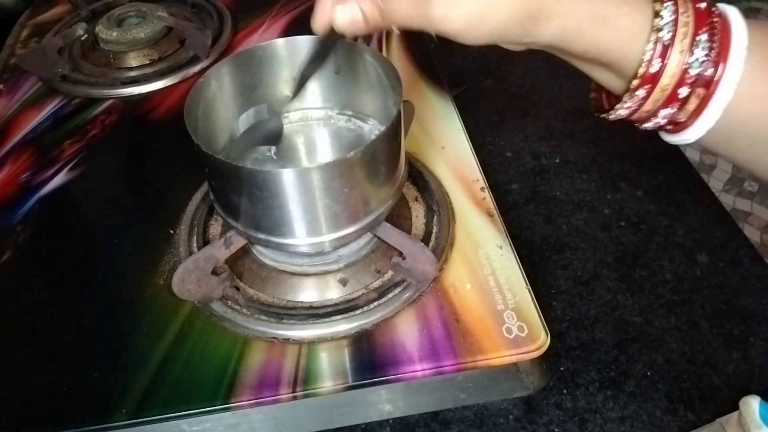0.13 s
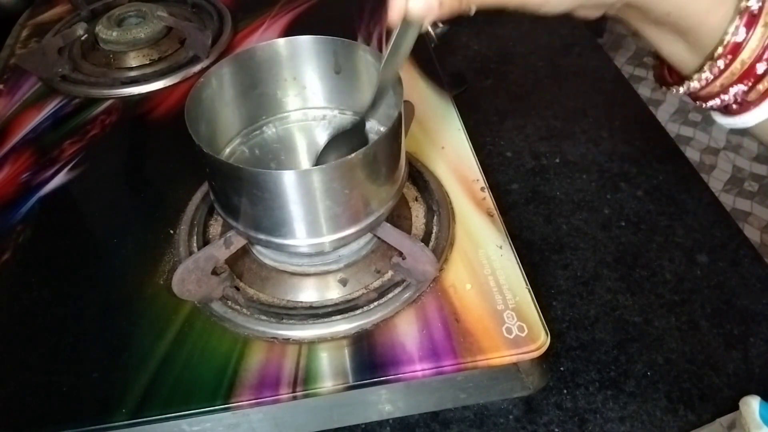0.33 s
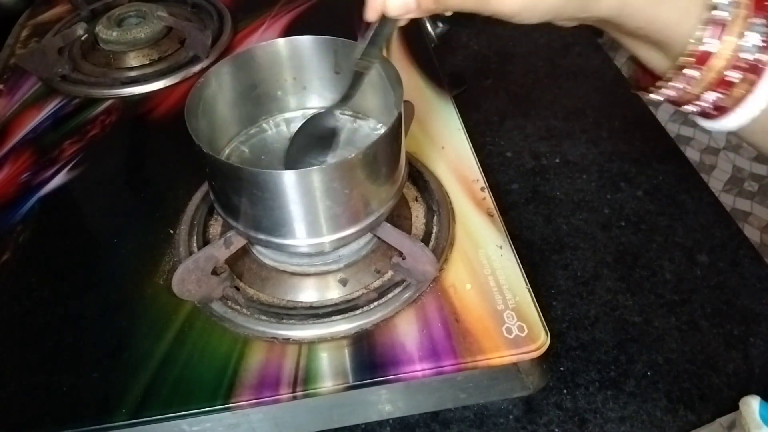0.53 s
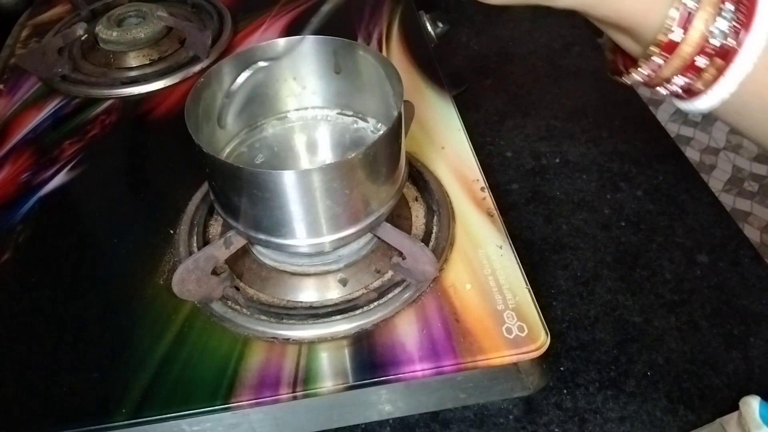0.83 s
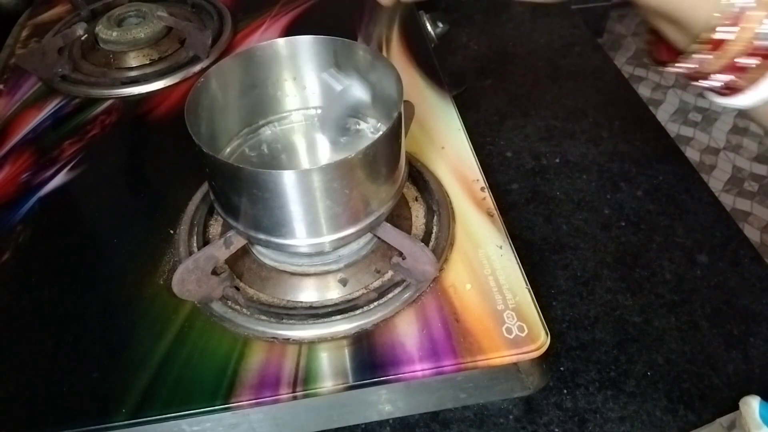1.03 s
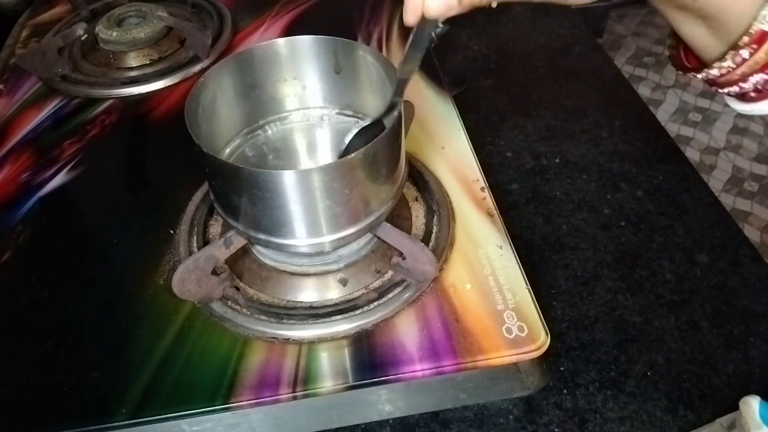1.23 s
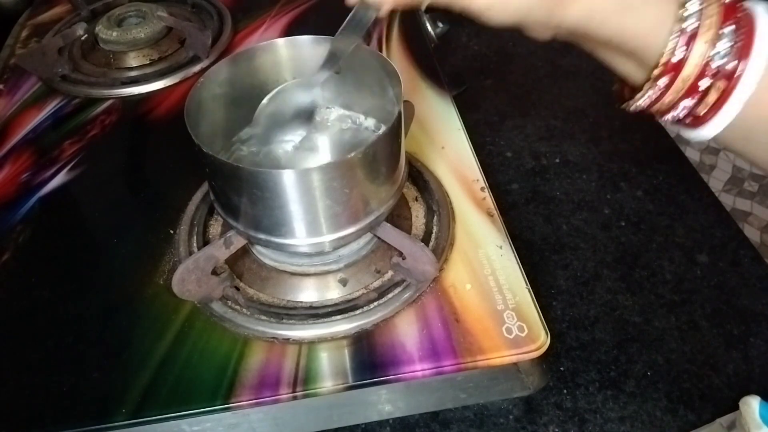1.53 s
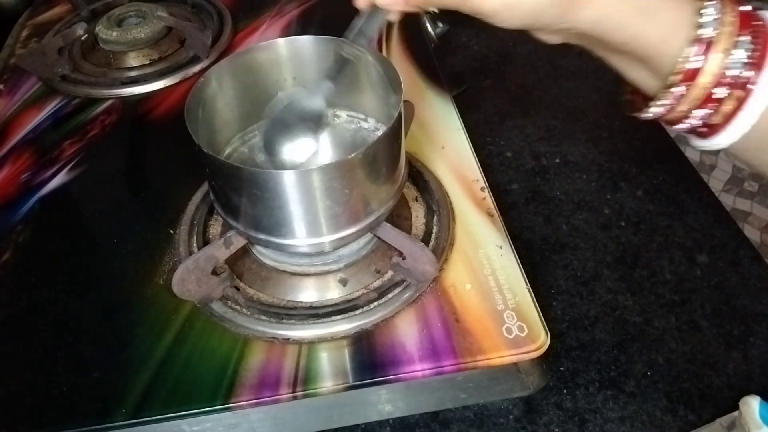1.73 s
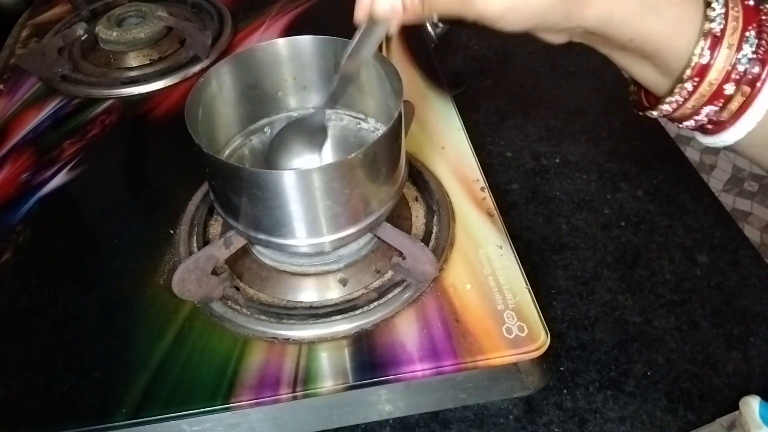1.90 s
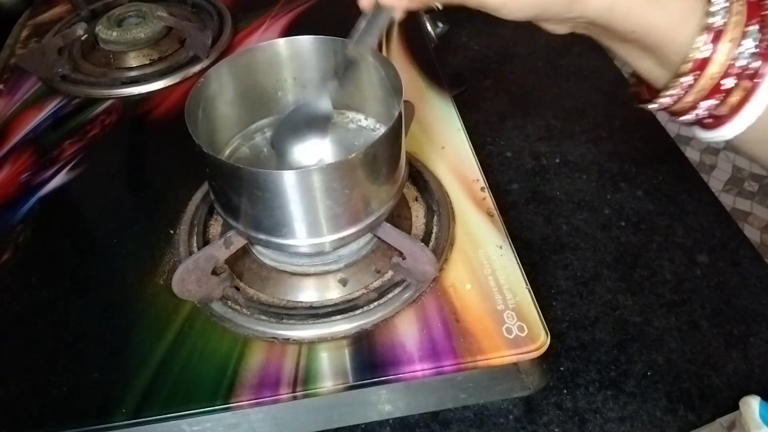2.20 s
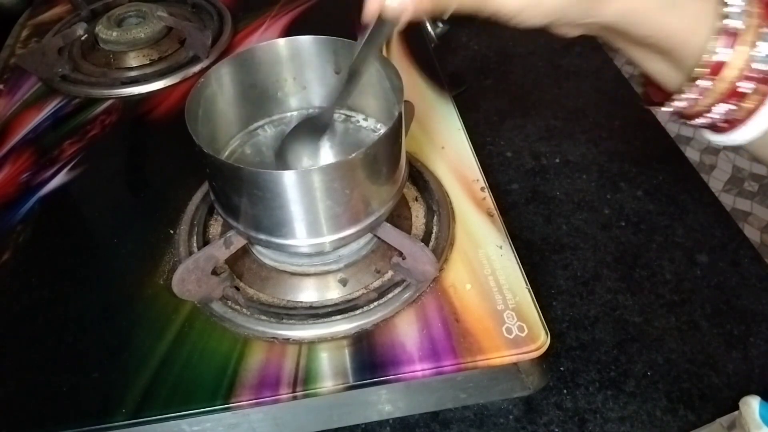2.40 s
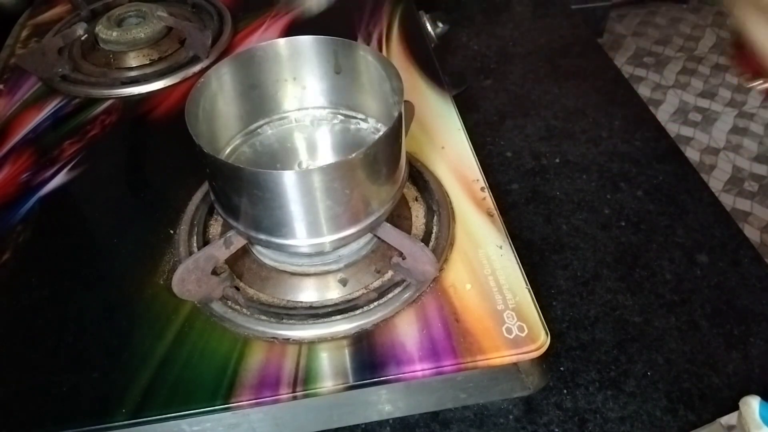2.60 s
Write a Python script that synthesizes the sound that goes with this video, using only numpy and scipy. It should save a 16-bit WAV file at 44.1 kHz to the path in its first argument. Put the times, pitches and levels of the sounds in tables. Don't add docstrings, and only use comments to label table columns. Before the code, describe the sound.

Spoon stirring in a small metal pot: gritty scrapes, dull knocks and bright ringing clinks

```python
import sys
import numpy as np
from scipy import signal
from scipy.fft import rfft, irfft, next_fast_len
from scipy.io import wavfile
from scipy.ndimage import uniform_filter1d, map_coordinates

SR = 44100
rng = np.random.default_rng(int(sys.argv[2]) if len(sys.argv) > 2 else 0)


def to_linear_factor(level_db):
    exponent = np.asarray(level_db, float) / 20
    return 10 ** exponent


def wav_record(signal):
    frames = np.transpose(np.atleast_2d(signal))
    bounded = np.clip(frames, -1, 1)
    quanta = np.round(bounded * 32767).astype(np.int16)
    wavfile.write(sys.argv[1], SR, quanta)


N = 121275

# [start t/s, hardest t/s, end t/s, hardest level/dB, end level/dB]
STROKES = [(0.001, 0.0025, 0.033, -78.5, -102), (0.205, 0.19, 0.23, -70, -72),
           (0.984, 0.99, 0.98, -63, -82), (0.2155, 0.15, 0.37, -47, -56.5), (0.406, 0.45, 0.58, -50, -55),
           (0.58, 0.62, 0.64, -51.5, -62), (0.653, 0.698, 0.7194, -55.5, -61),
           (0.999, 0.9, 1.14, -54.5, -56), (1.027, 1.032, 1.21, -45.5, -78.5),
           (1.335, 1.34, 1.355, -55.5, -57), (1.391, 1.482, 1.59, -49, -66),
           (1.624, 1.64, 1.66, -52, -59.5), (1.677, 1.694, 1.698, -50, -62),
           (1.74, 1.763, 1.844, -52.5, -61), (1.877, 1.902, 2.05, -51.5, -65.5),
           (1.962, 2.05, 2.07, -51, -53.5), (2.126, 2.166, 2.28, -50, -73),
           (2.234, 2.32, 2.294, -51, -49.5), (2.365, 2.23, 2.462, -47, -58.5)]
# [t/s, peak level/dB]
CATCHES = [
    (0.185, -77),
    (0.4691, -34.5),
    (0.673, -47),
    (0.8834, -82),
    (1.4593, -32),
    (1.6829, -31),
    (1.7605, -34),
    (1.8002, -32.5),
    (1.9047, -40),
    (2.145, -45.5),
]
# [f/Hz, width/Hz, level/dB]
SCRAPED_BASE = [(1130, 196, -4.5), (2186, 140, -2.5), (2760, 37, -11), (3065, 140, -4), (3747, 305, -10.5),
                (4730, 100, -6), (5400, 158, -8), (7125, 152, 5), (8560, 210, -3), (9800, 140, -2),
                (11120, 96, -4), (11850, 150, -13.5), (13650, 190, 0.5), (14940, 800, -7.5)]
# [f/Hz, level/dB]
FIZZ = [(410, -62), (700, -61), (1120, -7), (1850, -5), (2250, 6), (4130, 2), (7030, 4), (15500, -4.5)]
DEAD_HZ = [800, 1880, 4170, 4190, 6000]
# [t/s, f/Hz, level/dB]
GLIDES = [
    [(0.5, 1060, -78), (0.566, 1089, -52.5), (0.7, 1223, -92)],
    [(1.37, 983, -65), (1.412, 1180, -66.5), (1.64, 1046, -59.5)],
    [(0.33, 1058, -58), (0.42, 1107, -59.5), (0.5, 1088, -67)],
    [(1.72, 1010, -62), (1.8, 968, -61), (1.94, 999, -85.5)],
    [(1.88, 2084, -74), (1.91, 2224, -62), (1.95, 2390, -61)],
    [(1.99, 994, -76), (2.09, 1012, -60), (2.12, 1010, -80)],
    [(1.5, 1514, -84), (1.58, 1685, -70), (1.63, 1700, -83)],
    [(2.13, 1632, -75), (2.19, 1703, -67), (2.2, 1770, -62)],
    [(1.4, 600, -68), (1.61, 643, -82), (1.67, 680, -45)],
    [(0.95, 4100, -85), (0.988, 4110, -71), (0.996, 4200, -74)],
    [(2.13, 1057, -92), (2.174, 982, -46.5), (2.2, 1040, -57.5)],
    [(2.27, 1056, -70), (2.308, 1058, -48.5), (2.36, 1042, -67)],
]
# [t/s, f/Hz, peak level/dB, t60/s]
PINGS = [(.004, 6370, -70, .067), (.02, 1050, -76, .2), (.219, 1051, -38, .3), (.42, 4950, -58, .06),
         (.466, 3106, -60, .1), (.521, 1770, -64, .15), (.595, 3170, -51, .064), (.601, 2353, -57, .083),
         (.665, 2757, -50, .051), (.7, 2232, -58, .11), (.709, 660, -59, .15), (.719, 1050, -52, .22),
         (.721, 5488, -74, .5), (.965, 3480, -77, .06), (.968, 1020, -73, .05), (.989, 2480, -70, .04),
         (1.01, 7575, -55, .45), (1.02, 7790, -68, .9), (1.021, 6785, -60, .7), (1.022, 2332, -55, .4),
         (1.023, 8500, -53, .3), (1.03, 3185, -66, .6), (1.031, 603, -54, .4), (1.04, 5490, -45, .18),
         (1.06, 5487, -60, .6), (1.09, 3580, -58, .4), (1.1, 947, -58, .8), (1.341, 7570, -56, .2),
         (1.342, 575, -51, .13), (1.343, 3890, -59, .3), (1.46, 2230, -60, .077), (1.615, 2005, -62, .1),
         (2.02, 2167, -58, .15), (2.031, 1750, -60, .05), (2.13, 3338, -55, .11), (2.398, 2040, -41, .059),
         (2.444, 1072, -46.5, .16), (2.551, 630, -61, .2), (2.611, 1040, -61, .1), (2.649, 1050, -66, .14),
         (1.952, 395, -49, .18), (1.342, 1250, -48, .06), (.299, 1400, -46, .05)]
# [t/s, peak level/dB, hob thud level/dB, wall ring level/dB, snap level/dB]
KNOCKS = [(0.217, -22, -12, -15.5, 4), (0.298, -29, -8.5, -29, 8), (0.999, -34.5, -10.5, -4.5, 10.5),
          (1.017, -33.5, -7.5, -3.5, 13), (1.339, -29, -35, -37, -4.5), (1.64, -31.5, -28, -34, -20),
          (1.694, -31.5, -6.5, -51, 8.5), (1.949, -27.5, -13.5, -46, 2.5), (2.205, -25, -12, -42, 4.5),
          (2.4, -42, -7, -13.5, 16), (2.436, -27.5, -10, -51, 8)]
# [f/Hz, level/dB]
BASE = [(970, -2), (1052, 2.5), (1110, -6), (1220, -15.5), (1315, -1.5), (1470, -2.5), (1750, -23),
        (2055, -5), (2403, -7.5), (2750, -11.5), (3100, -19)]
# [f/Hz, level/dB]
HOB = [(345, -18.5), (395, 2), (490, 3), (608, 1.5), (650, -3.5), (760, -9)]
WALL_HZ = [950, 3578, 3770, 3882, 4893, 5412, 5488, 6145, 6641, 6939, 7570, 8400, 9857, 11210]
# [level/dB, t60/s]
WALL = [(-13.5, 0.86), (-21, 1), (-27, 1), (-7, 0.39), (-17, 0.83), (-15, 0.42), (3.5, 0.13), (-57, 0.19),
        (-7.5, 0.3), (-7, 0.4), (-12, 0.39), (-15, 0.23), (-8, 0.067), (-24, 0.12)]
# [f/Hz, level/dB]
SNAP = [(150, -30), (250, -34), (1030, -2), (1700, -5.5), (5500, -20.5), (6000, -32), (7130, -15.5),
        (15500, -37)]
# [t/s, peak level/dB, f/Hz, t60/s]
TAPS = [
    (.2155, -31, 1120, 0.025),
    (.2985, -32.5, 986, .025),
    (0.307, -35.5, 1330, 0.019),
    (.32, -37.5, 1054, .03),
    (0.9967, -25.5, 1020, 0.014),
    (1.0159, -26.5, 1040, 0.019),
    (1.3392, -40, 1385, 0.052),
    (2.399, -42.5, 783, 0.054),
]
# [f/Hz, t60/s]
KITCHEN = [(300, 0.38), (1500, 0.36), (5000, 0.29), (12000, 0.12)]
# [f/Hz, level/dB]
HUM = [(15, -54), (30, -14.5), (125, -1.5), (215, -12.5), (290, -6.5), (600, -18.5), (3000, -28.5),
       (5500, -39), (8300, -23), (15500, -33)]


def scrape():
    drift_hz, drift_share = 44.6, 0.0093
    grit_db = 2.5 * rng.exponential(size=N) + 1.2 * wobble(55)
    push = pressure() * unit(rng.standard_normal(N) * to_linear_factor(grit_db))
    i = np.arange(441)
    for s, db in CATCHES:
        push[round(s * SR):][:441] += to_linear_factor(db - 12.5 - i / 20) * rng.standard_normal(441)
    rung = np.zeros(N)
    for hz, width_hz, db in SCRAPED_BASE:
        for side in (-1, 1):
            swell = to_linear_factor(db + 5.9 * wobble(18))
            pitch = hz + side * width_hz * 0.37 + (drift_hz + drift_share * hz) * wobble(12)
            rung += swell * moving(push, pitch, width_hz * 1.11)
    fizz = patchy(filtered(push, lambda f: to_linear_factor(along(FIZZ, f))), depth_db=4)
    return without_dead_pitches(to_linear_factor(10.5 + 1) * rung + to_linear_factor(-1.5) * fizz)


def pressure():
    swell_db, rest_db, let_go_s = 9, 17.5, 0.054
    t = np.arange(N) / SR
    strokes = []
    for start, hardest, end, top_db, end_db in STROKES:
        times = [start - 0.004, start, hardest, end, end + let_go_s]
        levels = [-110, top_db - swell_db, top_db, end_db, end_db - rest_db]
        strokes.append(to_linear_factor(np.interp(t, times, levels, right=-150)))
    return uniform_filter1d(np.max(strokes, axis=0), size=44)


def without_dead_pitches(x):
    width_hz = 220

    def response(f):
        return np.prod([(c * c - f * f) / (c * c - f * f + 1j * f * width_hz) for c in DEAD_HZ], axis=0)

    return filtered(x, response)


def singing():
    t, out = np.arange(N) / SR, np.zeros(N + SR)
    for rows in GLIDES:
        s, hz, db = np.transpose(rows)
        tone = unit(moving(rng.standard_normal(N), np.interp(t, s, hz), width_hz=43))
        level = to_linear_factor(np.interp(t, s, db, left=-150, right=-150))
        out[:N] += tone * uniform_filter1d(level, size=600)
    for s, hz, db, t60 in PINGS:
        ping = ring([(hz, db + 4, t60)], t[:SR], spread_db=0, attack_s=0.002, detune=0)
        out[round(s * SR):][:SR] += ping * to_linear_factor(2.5 * wobble(22)[:SR])
    return out[:N]


def knocks():
    out, t = np.zeros(N + SR), np.arange(SR) / SR
    for s, db, thud_db, wall_db, snap_db in KNOCKS:
        blow = to_linear_factor(snap_db - 10.5 - 60 * t / 0.035) * coloured(SNAP, SR) * (1 - np.exp(-t / 0.001))
        blow += to_linear_factor(-3.5) * dull_thud(BASE, t, t60=0.043, touch_s=0.0048)
        blow += to_linear_factor(4.5 + thud_db) * dull_thud(HOB, t, t60=0.055, touch_s=0.022)
        late = 66
        blow[late:] += to_linear_factor(-4.5 + 1.47 * wall_db) * wall_clink(t)[:-late]
        out[round(s * SR) - 88:][:SR] += to_linear_factor(db) * in_kitchen(blow)
    return microphone_low_cut(out[:N])


def dull_thud(modes, t, t60, touch_s):
    press = np.exp(-t / touch_s) * (1 - np.exp(-t / 0.0029))
    contact = rng.standard_normal(SR // 4) * press[:SR // 4]
    struck = ring([(*m, t60) for m in modes], t, spread_db=1, attack_s=0.001, detune=0.01)
    dull = signal.fftconvolve(struck, contact)[:SR]
    return dull / np.abs(dull).max()


def wall_clink(t):
    wall = np.column_stack([WALL_HZ, WALL])
    near = ring(wall, t, spread_db=2, attack_s=0.003, detune=0.004)
    near += ring(wall, t, spread_db=2, attack_s=0.003, detune=0.008)
    click = to_linear_factor(8 - 60 * t / 0.01) * np.gradient(rng.standard_normal(SR)) * 2
    return ring(wall, t, spread_db=0.27, attack_s=0.00046, detune=0) + to_linear_factor(0.5) * near + click


def taps():
    out, t = np.zeros(N + SR), np.arange(SR // 2) / SR
    for s, db, hz, t60 in TAPS:
        tones = np.sin(2 * np.pi * hz * t) + to_linear_factor(-9) * np.sin(2 * np.pi * 2.35 * hz * t)
        clang = to_linear_factor(-60 * t / t60) * tones
        click = to_linear_factor(-4 - 60 * t / 0.0036) * np.diff(rng.standard_normal(len(t) + 1))
        out[round(s * SR):][:len(t)] += to_linear_factor(db) * (clang + click)
    return microphone_low_cut(out[:N])


def microphone_low_cut(x):
    low_hz = 279
    return filtered(x, lambda f: (1j * f / (low_hz + 1j * f)) ** 4)


def in_kitchen(x):
    return x + to_linear_factor(-5) * signal.fftconvolve(x, kitchen_tail())[:len(x)]


def kitchen_tail():
    hz, t, z = signal.stft(rng.standard_normal(SR // 2), SR, nperseg=256)
    decay = to_linear_factor(-60 * t / along(KITCHEN, hz)[:, None])
    tail = signal.istft(z * decay, SR, nperseg=256)[1]
    return np.pad(tail / np.linalg.norm(tail), (130, 0))


def hum():
    return to_linear_factor(-72.5 + 0.15 * wobble(8.8)) * coloured(HUM, N)


def ring(modes, t, spread_db, attack_s, detune):
    hz, db, t60 = np.transpose(modes)[:, :, None]
    strength, phase, shift = rng.standard_normal((3, len(modes), 1))
    turns = 2 * np.pi * hz * (1 + detune * shift) * t + phase
    tones = to_linear_factor(db + spread_db * strength - 60 * t / t60) * np.sin(turns)
    return tones.sum(0) * (1 - np.exp(-t / attack_s))


def moving(x, hz, width_hz):
    turn = 2 * np.pi * np.cumsum(hz) / SR

    def low(f):
        return 1 / (1 + 2j * f / width_hz) ** 2

    in_phase = np.cos(turn) * filtered(x * np.cos(turn), low)
    return in_phase + np.sin(turn) * filtered(x * np.sin(turn), low)


def patchy(x, depth_db):
    z = signal.stft(x, nperseg=512)[2]
    field = uniform_filter1d(rng.standard_normal(z.shape), size=3, axis=0)
    field = uniform_filter1d(field, size=6, axis=1)
    return signal.istft(z * to_linear_factor(depth_db * unit(field)), nperseg=512)[1][:N]


def coloured(spectrum, size):
    return unit(filtered(rng.standard_normal(size), lambda hz: to_linear_factor(along(spectrum, hz))))


def filtered(x, response):
    m = next_fast_len(len(x) + SR // 10)
    return irfft(rfft(x, m) * response(np.fft.rfftfreq(m, 1 / SR)), m)[:len(x)]


def wobble(rate):
    return map_coordinates(rng.standard_normal(200), [np.arange(N) * rate / SR])


def along(points, hz):
    f, v = np.transpose(points)
    return np.interp(np.log(hz + 1), np.log(f + 1), v)


def unit(x):
    return x / np.sqrt(np.mean(x ** 2) + 1e-20)


def scene():
    spoon = scrape() + singing() + taps()
    return (knocks() + in_kitchen(spoon) + hum())[None]


def band_limit(x):
    return signal.sosfilt(signal.butter(12, 16860, fs=SR, output="sos"), x)


def record(dry):
    mix = filtered(dry[0], lambda hz: to_linear_factor(np.interp(hz, [15400, 15560], [0, -33.5])))
    return band_limit(mix[None])


dry = scene()
out = record(dry)
wav_record(out)
```